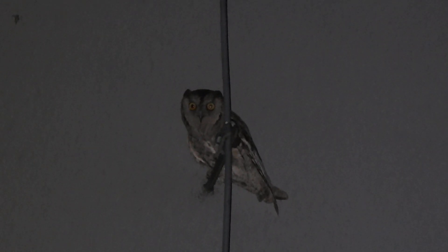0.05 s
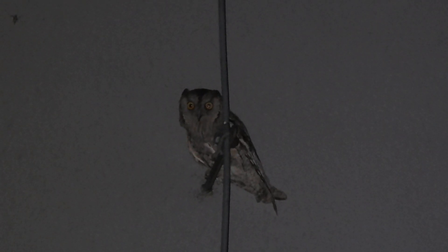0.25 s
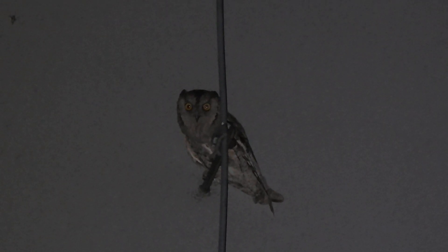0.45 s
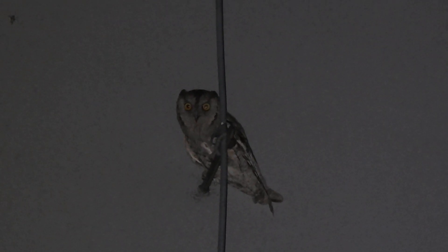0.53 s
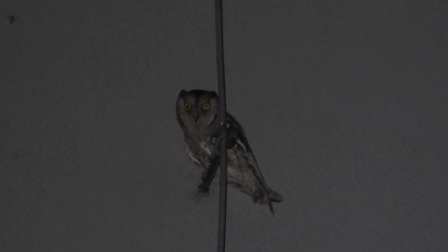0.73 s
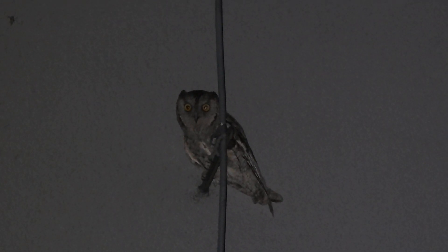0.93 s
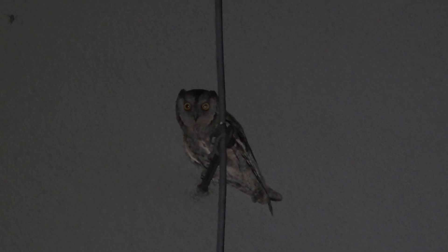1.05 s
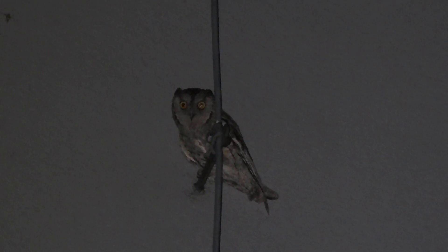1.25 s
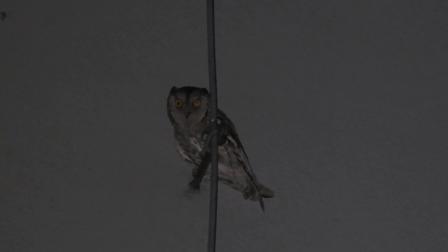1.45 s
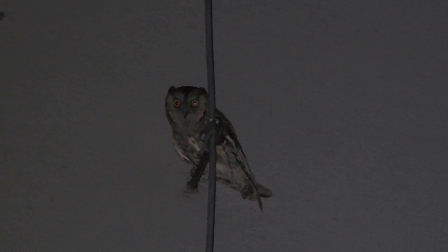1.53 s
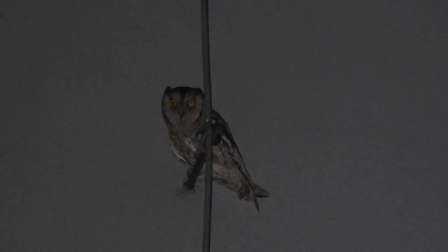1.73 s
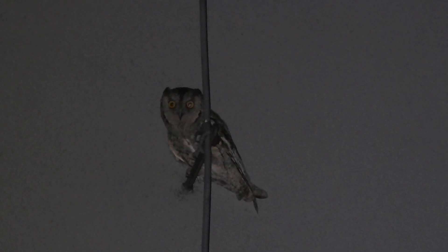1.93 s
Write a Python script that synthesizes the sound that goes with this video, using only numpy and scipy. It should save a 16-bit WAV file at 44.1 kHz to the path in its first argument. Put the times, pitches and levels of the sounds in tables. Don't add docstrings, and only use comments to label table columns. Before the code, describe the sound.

A small owl on a wire calls once, a near-pure flat note about a quarter second long. Distant road drone and faint cricket chirring continue outdoors beneath it, with small clicks afterwards near the microphone.

```python
import sys
import numpy as np
from scipy import signal
from scipy.fft import rfft, irfft
from scipy.io import wavfile
from scipy.ndimage import uniform_filter1d

SR = 44100
rng = np.random.default_rng(int(sys.argv[2]) if len(sys.argv) > 2 else 0)


def amplitude_ratio(level_db):
    exponent = np.asarray(level_db, float) / 20
    return 10 ** exponent


def wav_record(signal):
    frames = np.transpose(np.atleast_2d(signal))
    bounded = np.clip(frames, -1, 1)
    quanta = np.round(bounded * 32767).astype(np.int16)
    wavfile.write(sys.argv[1], SR, quanta)


N = 88200

# (time [s], pitch [Hz], level [dB])
WHISTLE = [
    (0.229, 1731, -44.5),
    (0.236, 1620, -29),
    (0.2443, 1256, -16),
    (0.266, 1233, -20.5),
    (0.321, 1257, -20.5),
    (0.379, 1285, -13.5),
    (0.412, 1302, -15.5),
    (0.449, 1289, -17),
    (0.463, 1264, -17.5),
]
# (multiple of the pitch, level [dB], share of the swell followed [0..1], near wall gain [dB])
OVERTONES = [(2, -46, 0.3, -3), (3, -43, 0.95, 3), (4, -56, .5, 4), (5, -45.5, .75, 0)]
# (delay [s], level [dB], left over right [dB])
FAR_WALLS = [
    (.14, -22, -1),
    (.168, -36, 0),
]
# (frequency [Hz], level per Hz [dB])
RUMBLE = [(12, -50), (20, -22), (37, -11.5), (54, -8), (71, 1), (184, -9.5), (222, -15), (302, -17),
          (420, -20.5), (550, -41), (920, -120)]
# (frequency [Hz], level per Hz [dB])
ROAR = [(250, -55.5), (420, -8), (498, -5), (682, -2.5), (742, -6.5), (808, 0.5), (1390, -8.5),
        (1720, -16.5), (3200, -33), (4160, -63.5), (7040, -120)]
# (time [s], level [dB], brightness [dB])
ROAR_SWELL = [(0, -41.5, 2.5), (.3, -41, -2), (.65, -41.5, -0.45), (.95, -42.5, 2.5), (1.2, -45, 3.5),
              (1.5, -42, 0), (1.8, -40.5, -0.5), (2, -41, -0.2)]
# (frequency [Hz], level per Hz [dB])
HISS = [(1880, -41), (3200, -8.5), (4880, -1.5), (5610, -4.5), (6400, -2.5), (8010, -4.5), (9140, -3),
        (11500, -15.5), (15500, -19.5)]
# (frequency [Hz], likeness [-1..1])
LIKENESS = [(60, 0.99), (250, .95), (1200, 0.94), (2400, 0.69), (4700, 0.074), (6400, 0.27), (8500, -0.44),
            (12000, -0.15)]
# (frequency [Hz], balance [dB])
BALANCE = [(60, -1.5), (380, -2.0), (2380, -1), (15000, -1.5)]
# (time [s], level [dB])
HUM_LEVEL = [(0.0, -45), (0.08, -37.5), (0.23, -61.5), (0.32, -35), (0.82, -35), (0.87, -72), (1.31, -43),
             (1.4, -87), (1.56, -28), (1.84, -73), (1.9, -28), (2.0, -70)]
# (time [s], level [dB], pitch [Hz])
ENGINE_WHINE = [(0, -49, 601), (.12, -43.5, 601), (.165, -48, 600), (.21, -41, 598), (.25, -44, 598),
                (.28, -54, 598), (.335, -46.5, 600), (.385, -54, 600), (.43, -47.5, 600), (.48, -55, 598),
                (.62, -58, 592), (.67, -42, 594), (.76, -46, 605), (.8, -65, 603), (1.0, -58, 598),
                (1.09, -47, 598), (1.2, -62, 598), (2, -66, 598)]
# (time [s], peak level [dB])
TICKS = [
    (0.5897, -43),
    (0.795, -50),
    (0.829, -44),
    (0.968, -32.5),
]
# (time after its start [s], level [dB])
STROKES = [
    (0, 0),
    (.033, -.5),
    (.072, -8),
]
# (time [s], level [dB])
CRICKET_LEVEL = [(0, -62), (.48, -62), (.75, -65), (1.1, -60), (1.43, -61), (1.6, -66.5), (2, -59)]
# (time [s], level [dB])
CAMERA_LEVEL = [(0, -82), (.11, -80), (.14, -88), (.67, -89), (.71, -81), (1.1, -83), (1.2, -90),
                (1.78, -90), (1.82, -80), (1.92, -80), (1.95, -87), (2, -86)]


def rms_one(x):
    return x / np.sqrt(np.mean(x ** 2) + 1e-20)


def in_time(rows):
    s, *columns = np.transpose(rows)
    return [np.interp(np.arange(N) / SR, s, c) for c in columns]


def at_hz(points, hz, outside=None):
    p = np.array(points, float)
    return np.interp(np.log(hz), np.log(p[:, 0]), p[:, 1], outside, outside)


def drift(rate_hz):
    r = np.exp(-80 * np.pi * rate_hz / SR)
    slow = signal.lfilter([1], [1, -2 * r, r * r], rng.standard_normal(N // 40 + 2002))[2000:]
    return np.interp(np.arange(N) / 40, np.arange(len(slow)), rms_one(slow))


def sides(db):
    return amplitude_ratio(np.array([db / 2, -db / 2])).reshape(2, -1)


def two_ears(mid, side, alike):
    return np.sqrt(1 + alike) * mid + np.sqrt(1 - alike) * side * [[1], [-1]]


def wide_noise(spectrum):
    hz = np.maximum(np.arange(N // 2 + 1) * SR / N, 1)
    mid, side = rfft(rng.standard_normal((2, N)))
    pair = two_ears(mid, side, np.clip(at_hz(LIKENESS, hz), -.99, .995))
    colour = amplitude_ratio(at_hz(spectrum, hz, outside=-200)) * sides(at_hz(BALANCE, hz))
    out = irfft(pair * colour, N)
    return out / np.sqrt(np.mean(out.mean(axis=0) ** 2))


def patchy(x):
    patch_db, patch_rate_hz = 1.5, 4
    hz = np.arange(N // 2 + 1) * SR / N
    step = np.clip(3 * np.log2((hz + 1) / 300), 0, 9)
    spectrum = rfft(x)
    out = np.zeros((2, N))
    for k in range(10):
        band = irfft(spectrum * np.clip(1 - abs(step - k), 0, 1), N)
        out += amplitude_ratio(patch_db * drift(patch_rate_hz)) * band
    return out


def tone(hz, wander_hz, db):
    phase = 2 * np.pi * np.cumsum(hz + wander_hz * drift(4.63)) / SR
    return np.sqrt(2) * amplitude_ratio(db) * np.sin(phase)


def hiss():
    return amplitude_ratio(-59) * wide_noise(HISS)


def camera_whine():
    return tone(11000, .3, in_time(CAMERA_LEVEL)[0])


def engines():
    hum = tone(69, 1.3, in_time(HUM_LEVEL)[0] - 6.0)
    whine_db, whine_hz = in_time(ENGINE_WHINE)
    return sides(-2.0) * (hum + tone(whine_hz, 1.5, whine_db))


def tyres():
    bright_hz = 1150
    rumble = amplitude_ratio(-39) * wide_noise(RUMBLE)
    roar = patchy(wide_noise(ROAR))
    level_db, bright_db = in_time(ROAR_SWELL)
    hz = np.arange(N // 2 + 1) * SR / N
    top = irfft(rfft(roar) / (1 + (bright_hz / (hz + 1)) ** 6), N)
    return rumble + amplitude_ratio(level_db) * (roar + (amplitude_ratio(bright_db) - 1) * top)


def cricket_band(low_hz, high_hz, order):
    band = signal.butter(order, [low_hz, high_hz], "band", fs=SR, output="sos")
    return rms_one(signal.sosfilt(band, rng.standard_normal((2, N))))


def crickets():
    first_s, period_s, stroke_s, spread_db = .0352, .1072, .005, 1.0
    peak_hz, peak_width_hz, peak_db = 9180, 320, 1.5
    t = np.arange(N) / SR
    strokes = np.zeros(N)
    for start in first_s + period_s * np.arange(-1, 20):
        for lag, db in STROKES:
            chance_db = spread_db * rng.standard_normal()
            strokes += amplitude_ratio(db + chance_db) * np.exp(-((t - start - lag) / stroke_s) ** 2 / 2)
    rasp = cricket_band(7900, 10200, order=4)
    peak = cricket_band(peak_hz - peak_width_hz / 2, peak_hz + peak_width_hz / 2, order=2)
    mid, side = rasp + amplitude_ratio(peak_db) * peak
    return amplitude_ratio(in_time(CRICKET_LEVEL)[0]) * strokes * two_ears(mid, side, -.65)


def ticks():
    ring_hz, snap_hz, snap_db = 6470, 8500, -8
    peak_s, width_s, bounce_s, bounce_db = .0014, .0004, .0016, -12
    right_lag_s = .00004
    t = np.arange(N) / SR - np.array([[0], [right_lag_s]])

    def bump(age):
        return np.exp(-(age / width_s) ** 2 / 2)

    out = np.zeros((2, N))
    for s, db in TICKS:
        age = t - s - peak_s
        shape = bump(age) + amplitude_ratio(bounce_db) * bump(age - bounce_s)
        ring = shape * np.sin(2 * np.pi * ring_hz * age)
        snap = bump(age + width_s) * np.sin(2 * np.pi * snap_hz * age)
        out += amplitude_ratio(db) * (ring + amplitude_ratio(snap_db) * snap)
    return out


def walls(pure, overtones_at_wall, hz):
    near_s, near_db, near_loss_db_per_hz = .01295, -8, .03
    far_loss_db_per_hz, low_edge_hz, high_edge_hz = .3, 1287, 1310
    t = np.arange(N) / SR

    def late(x, lag_s):
        return np.interp(t - lag_s, t, x, 0)

    above_hz = np.maximum(hz - high_edge_hz, 0)
    below_hz = np.maximum(low_edge_hz - hz, 0)
    dulled = amplitude_ratio(-near_loss_db_per_hz * above_hz) * pure
    near = amplitude_ratio(near_db) * late(dulled + overtones_at_wall, near_s)
    thinned = amplitude_ratio(-far_loss_db_per_hz * (below_hz + above_hz)) * dulled
    far = sum(amplitude_ratio(db) * sides(pan_db) * late(thinned, lag_s) for lag_s, db, pan_db in FAR_WALLS)
    return near + far


def owl():
    fade_in_s, fade_out_s = .0088, .012
    pitch_jitter, flutter_db = .0005, 1.2
    t = np.arange(N) / SR
    hz, db = in_time(WHISTLE)
    start, end = WHISTLE[0][0], WHISTLE[-1][0]
    rise = np.clip(1 + (t - start) / fade_in_s, 0, 1) ** 2
    fall = np.sin(np.pi / 2 * np.clip(1 + (end - t) / fade_out_s, 0, 1)) ** 2
    gate = np.sqrt(2) * rise * fall
    smooth_hz = uniform_filter1d(hz, size=130)
    db = uniform_filter1d(db, size=130)
    phase = 2 * np.pi * np.cumsum(smooth_hz * (1 + pitch_jitter * drift(40))) / SR
    pure = gate * amplitude_ratio(db) * np.sin(phase)
    top_db = db.max()
    direct, at_wall = pure, 0
    for multiple, level_db, follows, wall_db in OVERTONES:
        overtone_db = top_db + level_db + follows * (db - top_db) + flutter_db * drift(25)
        overtone = gate * amplitude_ratio(overtone_db) * np.sin(multiple * phase)
        direct = direct + overtone
        at_wall = at_wall + amplitude_ratio(wall_db) * overtone
    return sides(-2) * (direct + walls(pure, at_wall, hz))


def scene():
    background = hiss() + camera_whine() + engines() + tyres()
    return background + crickets() + ticks() + owl()


def roll_off(x):
    return signal.sosfilt(signal.butter(12, 15650, fs=SR, output="sos"), x)


def record(dry):
    return roll_off(dry)


dry = scene()
out = record(dry)
wav_record(out)
```